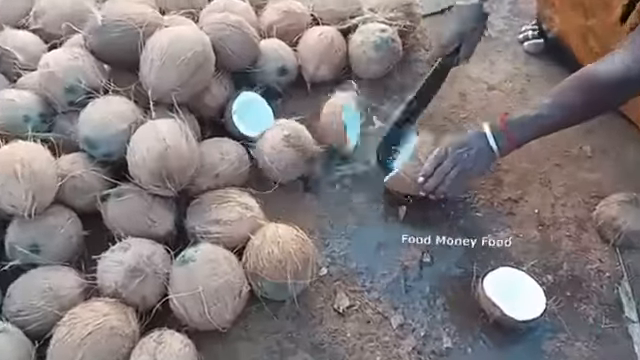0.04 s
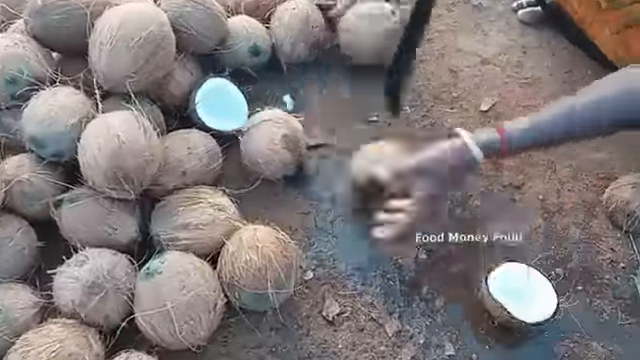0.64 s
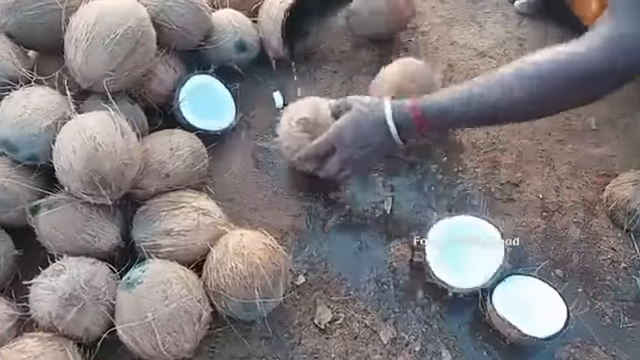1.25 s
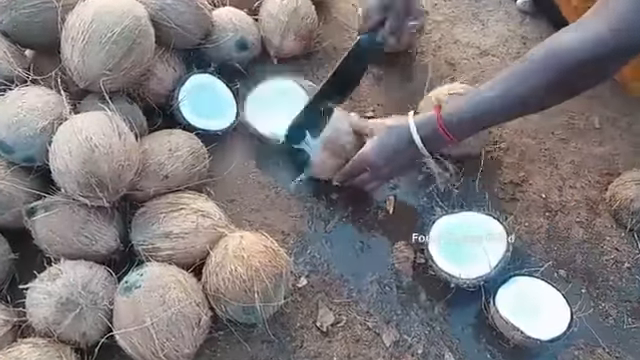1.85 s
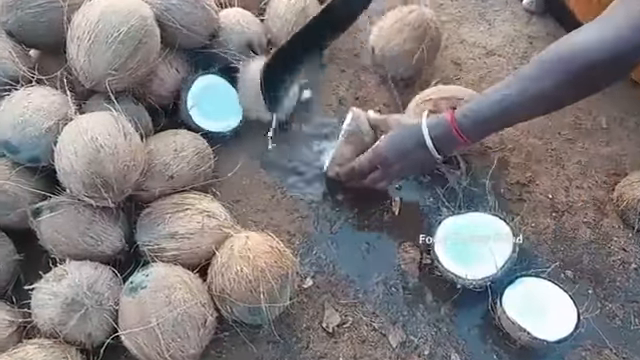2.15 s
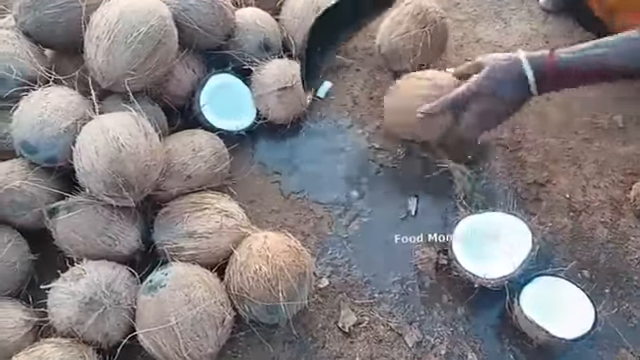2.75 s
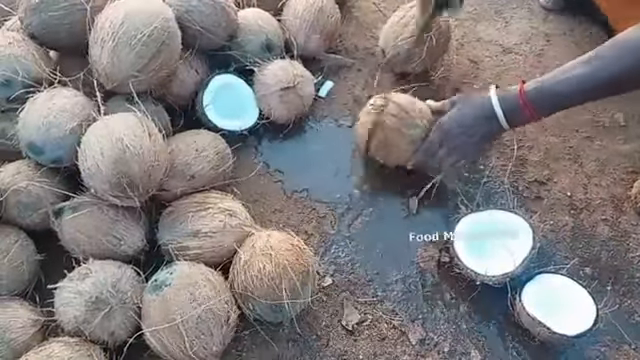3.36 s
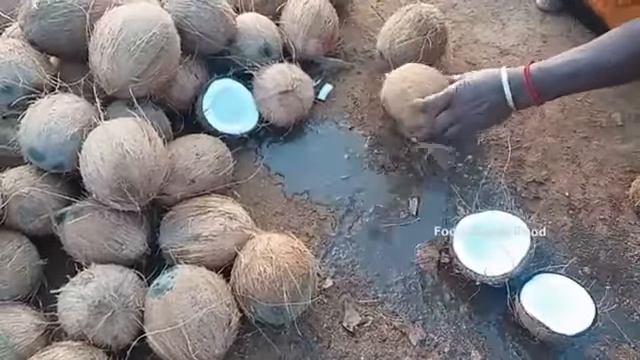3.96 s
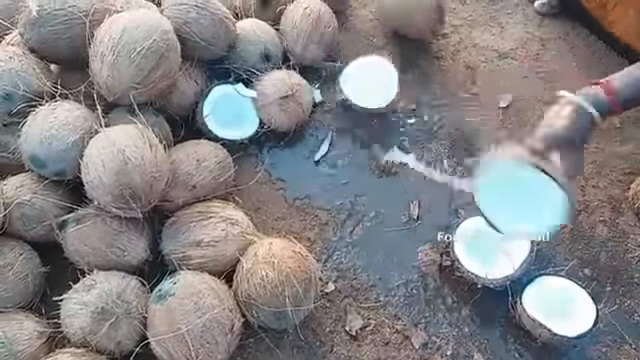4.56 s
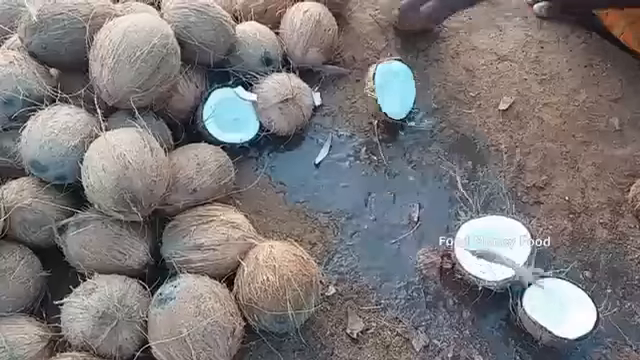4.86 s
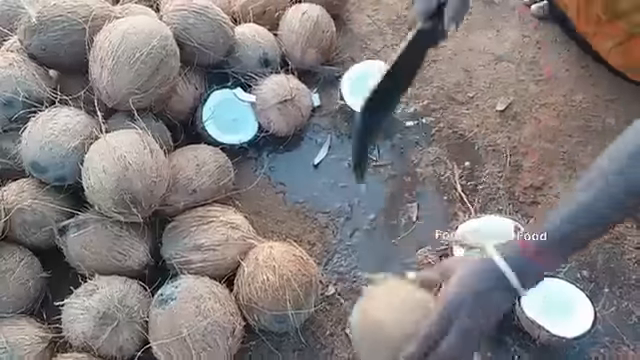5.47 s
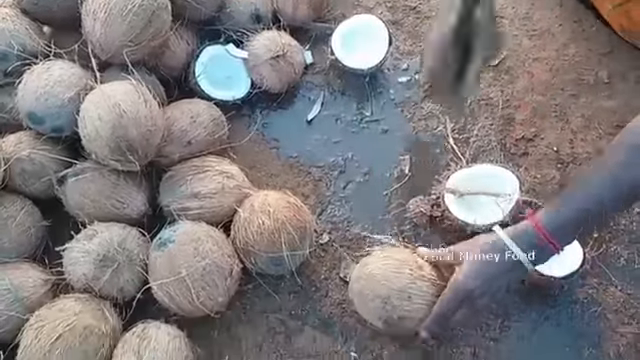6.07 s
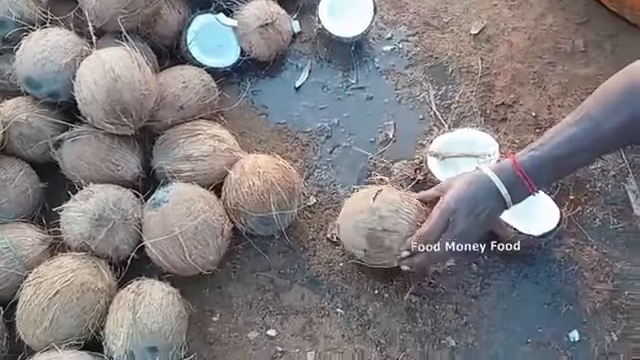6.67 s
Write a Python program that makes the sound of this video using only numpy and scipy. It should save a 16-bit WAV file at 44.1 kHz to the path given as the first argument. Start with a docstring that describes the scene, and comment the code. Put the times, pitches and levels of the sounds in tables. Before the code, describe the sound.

A heavy blade cracks into coconuts five times outdoors, ringing briefly, between hollow knocks of shells and faint birds.

```python
"""Over a faint outdoor rumble, a heavy steel blade cracks into a coconut on wet, packed earth.
Each of five chops splits shell, thumps the ground and sets the blade ringing; the open yard echoes.
Nuts and halves knock hollowly as they are dropped and set down, and husks rustle under the hand.
Small birds whistle far off."""
import sys
import numpy as np
from scipy import signal
from scipy.fft import rfft, irfft
from scipy.io import wavfile

SR = 44100
rng = np.random.default_rng(int(sys.argv[2]) if len(sys.argv) > 2 else 0)


def to_wav(s):
    """Save 16-bit WAV."""
    ch = np.atleast_2d(s).T  # columns
    pcm = np.round(np.clip(ch, -1, 1) * 32767)  # PCM
    wavfile.write(sys.argv[1], SR, pcm.astype(np.int16))


N = 295911
TIME = np.arange(N) / SR
AGE = TIME[:SR // 2]   # seconds into a half-second one-shot


def from_db(db):
    """Decibels to gain."""
    return 10 ** (np.asarray(db) / 20)


def rms_one(x):
    """Scale to unit power."""
    return x / np.sqrt(np.mean(x ** 2) + 1e-20)


def fade(age, t60):
    """Full until age zero, then down 60 dB every t60 seconds."""
    return np.exp(-np.log(1000) * np.maximum(age, 0) / t60)


def add(out, s, sound):
    """Mix a sound in at s seconds."""
    at = max(int(round(s * SR)), 0)
    out[at:at + len(sound)] += sound[:N - at]


def noise(spectrum, size, tilt_db=0):
    """Steady unit-power noise of a given colour, tilted by tilt_db per octave."""
    octave = np.log2(np.maximum(np.fft.rfftfreq(size, 1 / SR), 1))
    hz, db = np.transpose(spectrum)
    colour_db = np.interp(octave, np.log2(hz), db)
    slope_db = tilt_db * np.maximum(octave, np.log2(hz[0]))
    return rms_one(irfft(rfft(rng.standard_normal(size)) * from_db(colour_db + slope_db), size))


def grain(size, per_s, depth_db):
    """Roughness: a unit-power gain that slides to a new random level per_s times a second."""
    steps = np.clip(rng.standard_normal(size), -2, 2)
    wander = np.interp(np.arange(size) * per_s / SR, np.arange(size), steps)
    return rms_one(from_db(depth_db * wander))


def mode(hz, t60, soft_cycles=0):
    """A struck resonance; a soft contact rounds its attack over about soft_cycles cycles."""
    swell = 1 - np.exp(-(AGE * hz / (soft_cycles + 1e-6)) ** 2)
    return np.sin(2 * np.pi * hz * AGE) * fade(AGE, t60) * swell


# far murmur with a faint hiss on top: (frequency [Hz], relative level [dB])
AIR_COLOUR = [(200, -8), (350, -1.5), (700, -3), (1100, -0.5), (2000, -5.5), (3300, -9.5), (4500, -15),
              (6400, -23), (8000, -16.5), (10000, -27), (15000, -27)]
# low end of the ambience and of rolling nuts: (frequency [Hz], relative level [dB])
RUMBLE_COLOUR = [(15, -50), (25, -12.5), (47, -5), (97, 2.5), (188, 1), (299, -11), (379, -13), (500, -23),
                 (650, -45), (1100, -120)]
def outdoors(air_db=-69, rumble_db=-64.5):
    """The ambience bed: a steady far murmur over a low rumble."""
    return from_db(air_db) * noise(AIR_COLOUR, N) + from_db(rumble_db) * noise(RUMBLE_COLOUR, N)


# splitting shell: (frequency [Hz], relative level [dB])
CRACK_COLOUR = [(60, -23.5), (150, -8), (300, -1.5), (700, 1), (1500, -5), (2500, -6), (4000, -7.5),
                (6500, -19.5), (8200, -18.5), (10500, -21), (15000, -17.5)]
# blade hits: (time [s], crack level [dB], crack hold [s], crack t60 [s], crack tilt [dB/octave],
# shell pitch [Hz], shell level [dB], hollow pitch [Hz], hollow level [dB], thump pitch [Hz],
# thump level [dB], blade level [dB], blade boost centre [Hz], boost [dB], ping level [dB])
CHOP_HITS = [(0.0427, -12.5, 0.0042, .08, -0.9, 429, 1.5, 778, -6.5, 52.2, -33.5, -19.5, 3302, 8.5, -26.5),
             (1.9252, -11.5, 0.008, 0.054, -.5, 335.4, -6.5, 1092, -7, 86.3, -16, -22, 3127, 9.5, -29.5),
             (3.4673, -10.5, .004, 0.032, -0.7, 368, 2.5, 559.6, -16, 61, -19, -18.5, 1412, 4, -18.5),
             (4.3034, -13.5, 0.0042, .054, 0.6, 502, -12.5, 937, -4.5, 70.76, -51, -27, 1965, 13.5, -19),
             (6.2026, -7.5, 0.0034, 0.065, 0.7, 380, -5, 1025, -6.5, 70, -6.5, -10, 11920, 10.5, -15)]
def chops(lower_ratio=0.59, lower_db=-6):
    """The edge tears the shell in a run of fractures. Returns two stems: impacts and ringing steel."""
    impacts, ringing = np.zeros(N), np.zeros(N)
    for (s, crack_db, hold, t60, tilt_db, shell_hz, shell_db, hollow_hz, hollow_db,
         thump_hz, thump_db, blade_db, boost_hz, boost_db, ping_db) in CHOP_HITS:
        fractures = grain(len(AGE), per_s=900, depth_db=4.5) * fade(AGE - hold, t60)
        add(impacts, s, from_db(crack_db) * noise(CRACK_COLOUR, len(AGE), tilt_db) * fractures)
        shell = mode(shell_hz, .03, soft_cycles=0.92)
        shell += from_db(lower_db) * mode(shell_hz * lower_ratio, .04, soft_cycles=0.93)
        add(impacts, s, from_db(shell_db) * shell)
        add(impacts, s, from_db(hollow_db) * mode(hollow_hz, 0.065, soft_cycles=5.9))
        # the nut passes the blow on to the earth a moment later
        add(impacts, s + 0.0012, from_db(thump_db) * mode(thump_hz, 0.084, soft_cycles=0.29))
        # the point of impact along the edge favours some bending modes
        weights_db = boost_db * np.exp(-(np.log2(BLADE_HZ / boost_hz) / .17) ** 2)
        steel = from_db(blade_db) * blade(weights_db) + from_db(ping_db) * edge_ping()
        # the ring blooms as the shell gives way and loosens its grip
        add(ringing, s + .005, steel * (1 - fade(AGE, .025)))
    return impacts, ringing


# partials of the steel: (frequency [Hz], level [dB], t60 [s])
BLADE_MODES = [(875, -1, .08), (1412, -1, .08), (1965, -2, .075), (2958, -1, .06), (3392, 1, .065),
               (3940, -5, .05), (4226, -11, .07), (4828, -20, .08), (5920, -19, .07), (6589, -18, .06),
               (9750, -25, .07), (10390, -26, .07), (11708, -15, .06), (12530, -34, .06),
               (14200, -14, .035)]
BLADE_HZ = np.array(BLADE_MODES)[:, 0]
def blade(weights_db, spread_db=3.5):
    """A short metallic clang: every blow strikes the steel's bending modes in a new balance."""
    out = 0
    for (hz, db, t60), weight_db in zip(BLADE_MODES, weights_db):
        gain = from_db(db + weight_db + rng.normal(0, spread_db))
        out += gain * mode(hz, t60, soft_cycles=0.62) * rng.choice([-1, 1])
    return out


def edge_ping(edge_hz=7618, t60=0.088, free_db=-38, free_t60=.42, twin_gap_hz=75, twin_db=-6):
    """The thin edge pings with a close pair of modes; a faint tail lingers once free of the shell."""
    def ring(hz):
        return mode(hz, t60, soft_cycles=3.5) + from_db(free_db) * mode(hz, free_t60)
    return ring(edge_hz) + from_db(twin_db) * ring(edge_hz + twin_gap_hz)


# brittle top end: (frequency [Hz], relative level [dB])
SNAP_COLOUR = [(800, -21.5), (2500, -10.5), (4000, -1), (6300, -12), (8200, 7), (11000, -5), (15000, -14.5)]
# sharp ticks: (time [s], level [dB], t60 [s])
SNAP_HITS = [(0.0463, -3, 0.00053), (0.772, -58, 0.025), (1.361, -61.5, 0.037), (1.393, -58, 0.033),
             (1.419, -64, .03), (2.7487, -41.5, 0.024), (4.8688, -19, 0.0088), (4.917, -52, 0.073),
             (4.973, -42, 0.019), (5.621, -43.5, 0.01)]
def snaps():
    """A bit of shell, fibre or grit gives way in a bright tick."""
    out = np.zeros(N)
    for s, db, t60 in SNAP_HITS:
        add(out, s, from_db(db) * noise(SNAP_COLOUR, len(AGE)) * fade(AGE, t60))
    return out


# tone of the echo off the walls: (frequency [Hz], relative level [dB])
WALL_COLOUR = [(70, -26), (200, -10.5), (400, -10), (1000, -8.5), (2200, 0.5), (4000, -4.5), (8000, 1),
               (15000, -5.5)]
def yard(send, near_db=-31, near_t60=0.31, far_db=-37, far_delay_s=.12, far_swell_s=0.029, far_t60=0.94):
    """Reverb: the heap of nuts scatters the sound at once; distant walls return a late, diffuse tail."""
    near_shape = rms_one(fade(AGE, near_t60) * (AGE > .006))
    far_attack = np.exp(-(np.minimum(AGE - far_delay_s, 0) / far_swell_s) ** 2)
    far_shape = rms_one(fade(AGE - far_delay_s, far_t60) * far_attack)
    near = from_db(near_db) * near_shape * noise(GRIT_COLOUR, len(AGE))
    far = from_db(far_db) * far_shape * noise(WALL_COLOUR, len(AGE))
    return signal.fftconvolve(send, (near + far) / np.sqrt(len(AGE)))[:N]


# crunch of grit and husk: (frequency [Hz], relative level [dB])
GRIT_COLOUR = [(50, -21.5), (150, -2.5), (400, 1), (1500, -0.5), (3500, -2.5), (6000, -9.5), (8200, -10.5),
               (11000, -14), (15000, -14.5)]
# nuts and halves knocking: (time [s], body level [dB], body pitch [Hz], hollow level [dB],
# hollow pitch [Hz], hollow t60 [s], grit level [dB], grit t60 [s])
KNOCK_HITS = [(0.0640, -17.5, 693, -11, 1180, 0.033, -25, 0.044),
              (0.083, -24, 845, -19.5, 1480, 0.028, -26, 0.019),
              (0.5836, -43, 505, -37.5, 1290, 0.019, -64.5, .016),
              (0.597, -29.5, 380, -40.5, 1310, 0.031, -52, 0.37),
              (0.672, -18, 450, -35.5, 763, 0.13, -40, 0.083),
              (0.795, -2.5, 416, -16, 1448, 0.041, -22, 0.041),
              (0.7961, 2, 191, -19, 329, 0.11, -39, 0.051),
              (0.888, -19, 1014, -16.5, 1493, 0.014, -33.5, 0.013),
              (1.025, -40, 160.3, -30, 400, .05, -46, 0.054),
              (1.162, -44, 206.5, -47, 405, 0.088, -60.5, 0.15),
              (1.9750, -42, 1394, -28.5, 3390, 0.019, -33.5, 0.04),
              (2.0548, -9.5, 1058, -30, 2950, 0.02, -63, 0.049),
              (2.304, -43, 445, -41.5, 950, .009, -64, 0.0195),
              (2.685, -6, 637, -8.5, 1673, 0.018, -24, 0.025),
              (2.75, -31.5, 191, -56, 711, 0.013, -37.5, 0.028),
              (2.8530, -19.5, 740, -23.5, 1052, 0.019, -48, 0.017),
              (4.3051, -9.5, 400, -14, 630, .03, -32, .02),
              (4.8707, -22, 943, -20.5, 471, 0.025, -38.5, 0.038),
              (5.078, -28.5, 738, -27.5, 975, 0.044, -44.5, 0.082),
              (5.621, -23.5, 175, -14.5, 510, 0.0066, -33.5, 0.042),
              (6.2042, -3.5, 597, -5.5, 1580, 0.023, -24, 0.018)]
def knocks(reference_t60=0.016, reference_hz=515, damping_power=.35):
    """A knocked nut gives a damped body note and a hollow note, with grit crunching at the contact."""
    out = np.zeros(N)
    for s, body_db, body_hz, hollow_db, hollow_hz, hollow_t60, grit_db, grit_t60 in KNOCK_HITS:
        body_t60 = reference_t60 * (reference_hz / body_hz) ** damping_power   # higher notes die sooner
        body = from_db(body_db) * clatter(body_hz, body_t60)
        hollow = from_db(hollow_db) * clatter(hollow_hz, hollow_t60)
        grit = from_db(grit_db) * noise(GRIT_COLOUR, len(AGE))
        crunch = grain(len(AGE), per_s=530, depth_db=11) * fade(AGE, grit_t60)
        add(out, s, body - hollow + grit * crunch)
    return out


def clatter(hz, t60, rocking_db=-16, rocking_stretch=2.2):
    """A damped note, blurred by the uneven shell rocking on the ground for a little longer."""
    band = [(hz / 10, -40), (hz / 1.4, -11), (hz, 0), (hz * 2.1, -14), (hz * 10, -55)]
    rocking = noise(band, len(AGE)) * fade(AGE, t60 * rocking_stretch) * (1 - fade(AGE, 0.0036))
    return mode(hz, t60, soft_cycles=0.6) + from_db(rocking_db) * rocking


# glancing touches: (time [s], blade level [dB], tilt [dB/octave], ping level [dB], scuff level [dB])
GRAZE_HITS = [(0.131, -58, 10, -45.5, -39.5), (0.5970, -46, 3.5, -56, -67), (2.0030, -53, -2, -76, -45.5),
              (3.586, -64, 6, -56, -48.5), (4.3941, -55, -5.5, -49, -41)]
def grazes(pivot_hz=4000, scuff_t60=0.037):
    """The blade brushes a nut, scuffing the husk and ringing lightly."""
    out = np.zeros(N)
    for s, db, tilt_db, ping_db, scuff_db in GRAZE_HITS:
        weights_db = tilt_db * np.log2(BLADE_HZ / pivot_hz)
        ring = from_db(db) * blade(weights_db) + from_db(ping_db) * edge_ping()
        scuff = from_db(scuff_db) * noise(GRIT_COLOUR, len(AGE)) * fade(AGE, scuff_t60)
        add(out, s, ring + scuff)
    return out


# a nut dragged, rolled or turned in the hand:
# (time [s], length [s], scrape level [dB], husk level [dB], rumble level [dB])
RUB_MOVES = [(0.259, 0.3, -61.5, -76, -80), (0.739, 0.063, -51, -69.5, -62.5), (0.864, 0.18, -59, -75, -57),
             (1.313, 0.15, -61, -70.5, -61), (1.473, 0.52, -65.5, -84.5, -60.5),
             (2.003, 0.1, -55.5, -85, -66), (2.553, 0.06, -61, -75, -73.5), (3.15, .3, -71, -88, -62.5),
             (3.564, 0.085, -64.5, -72, -69), (4.895, .06, -66.5, -69, -67.5),
             (5.1, 0.23, -67.5, -81, -63.5), (5.379, .3, -66, -76, -60.5), (5.682, .52, -58, -76.5, -53),
             (6.28, 0.091, -75, -61.5, -58.5)]
def rub_envelopes(attack_share=0.18, release_t60=0.52):
    """Gains of scrape, husk and rumble: each rub builds, holds and dies away; overlaps add in power."""
    power = np.zeros((3, N))
    for s, length, *levels_db in RUB_MOVES:
        attack = np.clip((TIME - s) / (attack_share * length), 0, 1)
        release = fade(TIME - s - length, release_t60)
        power += np.outer(from_db(levels_db), attack * release) ** 2
    return np.sqrt(power)


# dull scrape on earth: (frequency [Hz], relative level [dB])
SCRAPE_COLOUR = [(180, -31), (300, -2.5), (686, -8), (1190, -7), (1650, -2.5), (2400, -15.5), (3630, -14.5),
                 (4390, -24), (6000, -27.5), (7800, -45.5)]
# dry, papery husk fibres: (frequency [Hz], relative level [dB])
HUSK_COLOUR = [(2350, -30.5), (4000, -6.5), (4380, -9.5), (6400, -15.5), (7940, -5), (10300, -9.5),
               (11500, -10.5), (14400, -9.5), (15500, -14.5)]
def handling(rustle_db=-1, loose_grit_db=-90):
    """Nuts scrape and rumble on the earth as their fibres rustle; loose grit ticks now and then."""
    scrape_gain, husk_gain, rumble_gain = rub_envelopes()
    scrape = noise(SCRAPE_COLOUR, N) * grain(N, per_s=74, depth_db=1.5)
    rustle = from_db(rustle_db) * noise(HUSK_COLOUR, N) * grain(N, per_s=560, depth_db=2)
    husk = rustle + crackle(per_s=83)
    rumble = noise(RUMBLE_COLOUR, N)
    loose_grit = from_db(loose_grit_db) * crackle(per_s=12)
    return scrape_gain * scrape + husk_gain * husk + rumble_gain * rumble + loose_grit


def crackle(per_s, size_db=5, tilt_db=-5.5, t60=.012):
    """Single fibres and grains of grit give way at random; unit power."""
    sizes = from_db(size_db * np.minimum(rng.exponential(1, N), 3))
    triggers = rng.random(N) < per_s / SR
    envelope = signal.fftconvolve(sizes * triggers, fade(AGE, t60))[:N]
    return rms_one(envelope * noise(SNAP_COLOUR, N, tilt_db))


# pitch glides by whistle name: (start [Hz], middle [Hz], end [Hz])
WHISTLE_GLIDES = {"down": (4150, 2750, 2280), "low": (3050, 2230, 2080), "up": (2950, 3580, 3720),
                  "long": (5700, 4620, 3300)}
# distant calls: (time [s], length [s], whistle [name], level [dB])
BIRD_CALLS = [(1.482, .1, "low", -62.5), (2.401, .08, "down", -69), (2.493, .14, "long", -75.5),
              (3.083, .05, "up", -71.5), (3.219, 0.057, "down", -68.5), (3.915, 0.08, "low", -67),
              (4.088, .11, "low", -63.5), (4.224, 0.041, "up", -71), (5.045, 0.038, "up", -65),
              (5.181, 0.053, "down", -60), (5.326, 0.13, "long", -65.5), (5.448, 0.049, "up", -58),
              (5.857, 0.039, "up", -51.5), (5.998, 0.068, "down", -54)]
def birds():
    """Faint whistles that glide through three pitches, with a slight warble."""
    out = np.zeros(N)
    for s, length, whistle, db in BIRD_CALLS:
        progress = np.minimum(AGE / length, 1)
        glide = np.polyfit([0, .5, 1], WHISTLE_GLIDES[whistle], 2)
        hz = np.polyval(glide, progress) * grain(len(AGE), per_s=400, depth_db=.15)
        swell = np.sqrt(np.abs(np.sin(np.pi * progress)) / 2)
        flutter = grain(len(AGE), per_s=150, depth_db=5)
        tone = np.sin(2 * np.pi * np.cumsum(hz) / SR)
        add(out, s, from_db(db) * swell * flutter * tone)
    return out


def scene(steel_send_db=-3.5, nut_send_db=-8, bird_send_db=18.5):
    """The mono mix: blows and birds with their yard echoes, handling noise and the open air."""
    impacts, ringing = chops()
    steel = ringing + grazes()
    nuts = knocks() + snaps()
    song = birds()
    send = (impacts
            + from_db(steel_send_db) * steel   # the flat blade beams its ring mostly away from the walls
            + from_db(nut_send_db) * nuts      # the knocks and ticks sound drier, with less yard echo
            + from_db(bird_send_db) * song)    # far away, so much of it arrives scattered
    return (impacts + steel + nuts + song + yard(send) + handling() + outdoors())[None]


def record(dry, low_cut_hz=36, clip_level=.95, high_cut_hz=15400):
    """The small microphone drops the deepest bass, the loudest peaks overload and the top is cut."""
    thinned = signal.sosfilt(signal.butter(4, low_cut_hz, "high", fs=SR, output="sos"), dry)
    clipped = np.clip(thinned, -clip_level, clip_level)
    return signal.sosfilt(signal.ellip(10, .3, 80, high_cut_hz, fs=SR, output="sos"), clipped)


dry = scene()
out = record(dry)
to_wav(out)
```